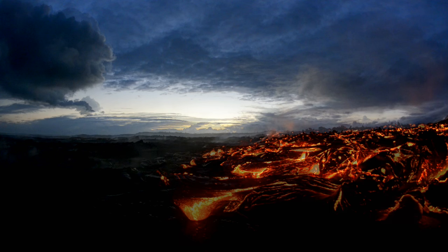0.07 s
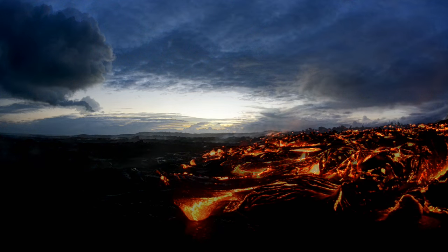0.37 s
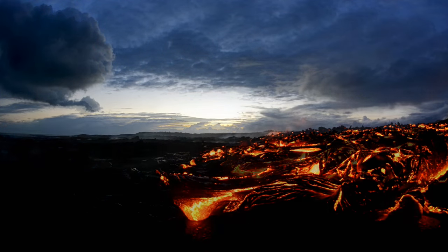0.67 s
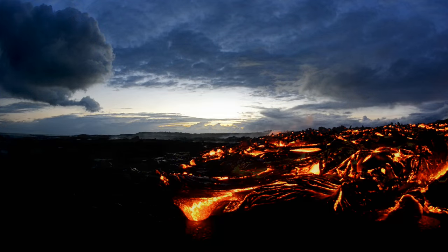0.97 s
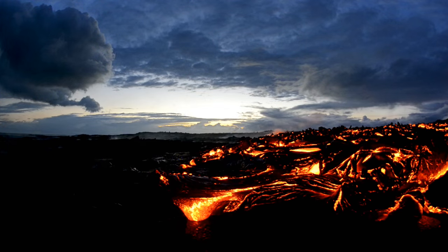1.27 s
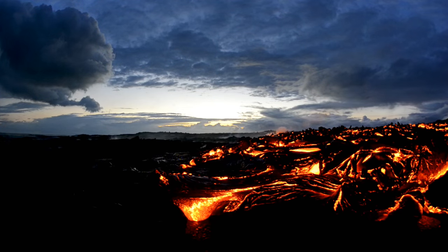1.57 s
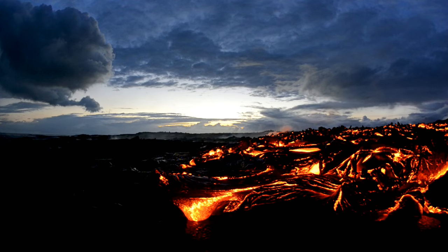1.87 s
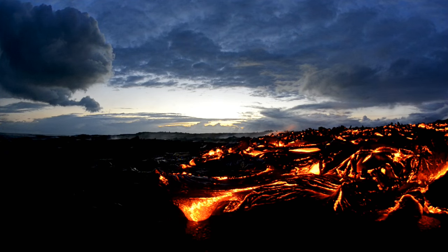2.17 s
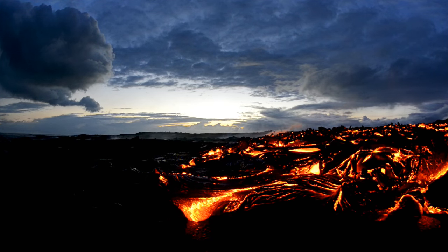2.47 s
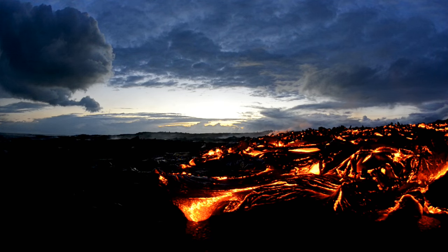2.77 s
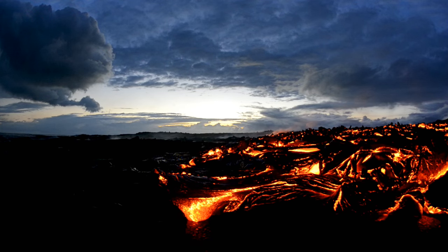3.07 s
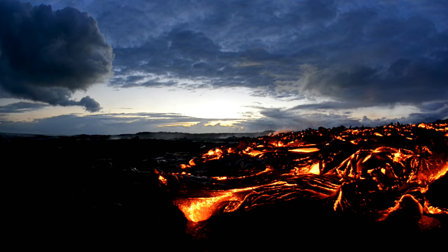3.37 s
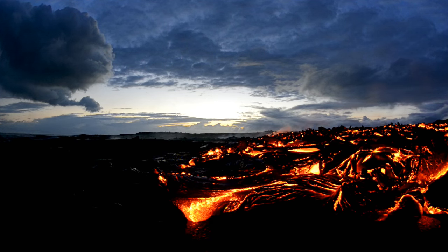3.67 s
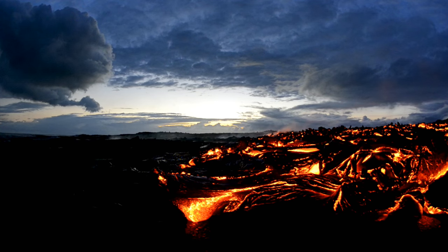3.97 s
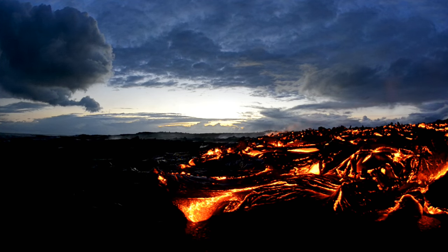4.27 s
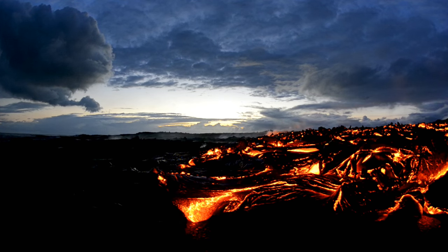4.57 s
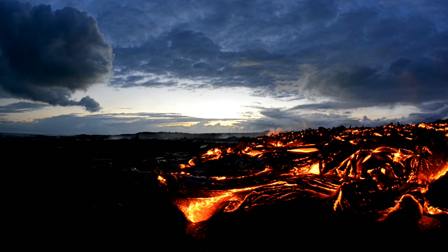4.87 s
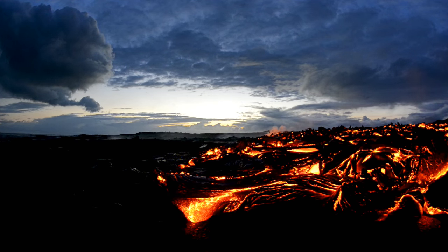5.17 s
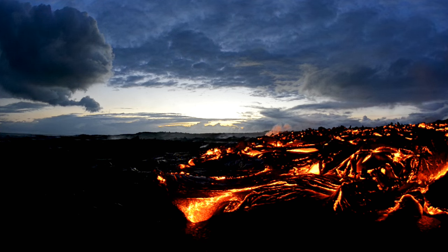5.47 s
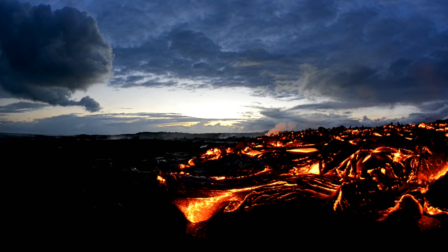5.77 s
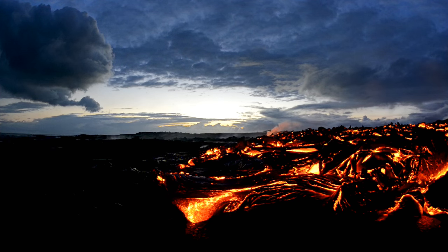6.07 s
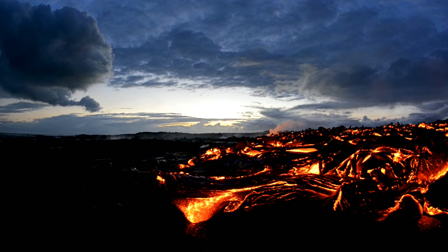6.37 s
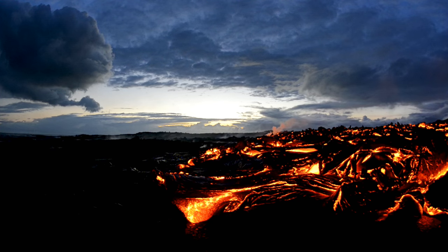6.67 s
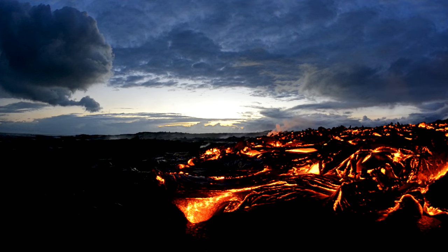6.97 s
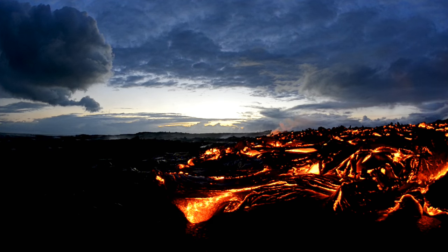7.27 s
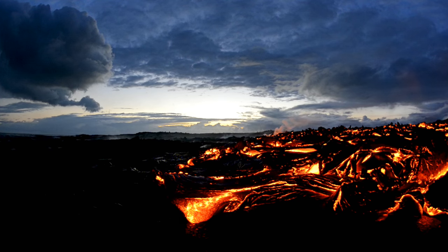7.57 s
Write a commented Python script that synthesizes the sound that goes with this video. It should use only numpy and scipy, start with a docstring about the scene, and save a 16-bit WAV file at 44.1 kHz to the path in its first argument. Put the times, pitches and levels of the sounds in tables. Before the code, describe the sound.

A low wind rumble and the continuous crackle of cooling lava run together for about eight seconds, on open ground with no echo. A faint sizzle sits above the crackle, and close dry cracks, tiny glassy snaps and small crunches pop out irregularly, several each second. At about 1.8 seconds a loose slab of rock gives a short, loud knock. From 2.7 to 3.7 seconds thin flakes tick off in quick, high runs, with a strong crack at 3.1 and a low gust at 3.4. A softer knock comes near 4 seconds, and crackle and wind swell briefly at 4.7. Between 5 and 5.6 seconds louder cracks cluster with short spurts of sizzle. Another sharp crack lands at 6.8. The wind is a little stronger in the second half, buffeting the microphone around 7.2 to 7.5 seconds while the crackling carries on.

```python
"""The crust of a lava flow cools and breaks up in the open air, each fracture radiating a pressure pulse.
Near cracks are single sharp pulses, glassy flakes tick off in runs, crumbs of clinker crunch and two
loose slabs knock. Behind them countless fractures superpose into a crackle and sizzle; the busier the
flow, the louder its small breaks. The eddies of a gusty wind rumble on the microphone."""
import sys
import numpy as np
from scipy import signal
from scipy.fft import rfft, irfft, next_fast_len
from scipy.io import wavfile

SR = 44100
rng = np.random.default_rng(int(sys.argv[2]) if len(sys.argv) > 2 else 0)


def unload_audio(sound):
    """Save the sound as a 16-bit wav file, at the path given as the first command line argument."""
    columns = np.transpose(np.atleast_2d(sound))
    # keep every value between -1 and 1, then stretch to whole-number steps
    steps = np.round(np.clip(columns, -1, 1) * 32767)
    wavfile.write(sys.argv[1], SR, steps.astype(np.int16))


N = 345303
TIME = np.arange(N) / SR

# The breeze between gusts, freshening slowly. Each row: time in seconds, level in dB.
BREEZE = [(0.0, -24.5), (0.5, -19.5), (1.2, -19.5), (1.43, -23), (1.85, -19), (2.3, -23), (2.8, -20.5),
          (3.2, -23.5), (3.4, -15.5), (3.95, -19.5), (4.55, -16), (5.05, -19), (5.5, -16), (6.1, -17.5),
          (6.52, -18), (6.85, -16.5), (7.25, -14.5), (7.83, -16)]
# Spectra of large and of smaller eddies. Each row: frequency in Hz, relative level in dB.
RUMBLE_SPECTRUM = [(15, -20), (25, -8), (42, 0), (65, 1.5), (100, 1.5), (140, -1.5), (200, -16),
                   (320, -26.5)]
BUFFET_SPECTRUM = [(70, -11), (120, -5), (160, 0), (240, -5), (320, -12), (450, -19.5), (700, -30.5),
                   (1500, -42)]
# How busy the cooling crust is. Each row: time in seconds, crackle level in dB.
CRUST_ACTIVITY = [(0.0, -26), (0.2, -29), (1.3, -25.5), (2.35, -23.8), (2.55, -25.5), (3.7, -24.5),
                  (4.5, -25.5), (4.72, -18.5), (4.86, -25.5), (6.3, -25.5), (7.83, -25)]
USUAL_CRACKLE_DB = -25
# Filters that colour the crackle and the sizzle. Each row: frequency in Hz, relative gain in dB.
CRACKLE_SPECTRUM = [(250, -6.5), (450, 1.5), (700, 1), (950, 0), (1250, 4), (1800, -0.5), (2500, -1.5),
                    (3500, -8.5), (5000, -16.5), (8000, -24), (15000, -26)]
SIZZLE_SPECTRUM = [(2500, 10), (5000, 0.5), (7000, 0.5), (9500, -1.5), (12500, -3.5), (14500, -7),
                   (16000, -10)]
# Patches of glassy skin spalling. Each row: centre in seconds, rise of sizzle in dB, width in seconds.
FLURRIES = [(2.7, 4.5, 0.2), (3.14, 3.5, .06), (3.58, 4, .04), (4.53, 6, 0.027), (5.05, 12, 0.04),
            (5.23, 6, 0.065), (5.6, 9, 0.025), (6.02, 6.5, .025), (7.62, 10, 0.018)]
# Runs of flakes. Each row: start in seconds, length in seconds, mid-run level in dB, spacing in seconds.
TICK_RUNS = [(2.716, .21, -15.5, .016), (2.988, 0.3, -19.5, .034), (3.26, 0.23, -14.5, .022),
             (3.493, 0.21, -14, 0.036)]
# Near cracks of thick crust and snaps of thin glass. Each row: start in seconds, level in dB, pitch in Hz.
CRUST_CRACKS = [(0.8241, -6, 2090), (1.2861, -3.5, 1340), (1.4033, 2, 2200), (1.426, -3, 2090),
                (1.4503, -2, 1470), (1.7977, -9, 870), (1.8924, 0, 1000), (1.9546, -4, 2240),
                (2.0016, 2.5, 1610), (2.203, -4, 1020), (2.2674, -1.5, 1470), (2.2725, -2.5, 1610),
                (2.4614, -4, 1610), (2.647, -1.5, 1610), (2.659, -2, 1610), (2.8244, -6, 1910),
                (3.127, 7.5, 1750), (3.1421, -2, 1230), (3.5892, -4, 800), (4.281, -6, 840),
                (4.8843, -6, 2400), (5.0513, 2, 1910), (5.1781, -4.5, 1030), (5.221, -2.5, 1350),
                (5.2656, 7, 1470), (5.3561, 5, 1530), (5.4318, -3, 2520), (5.5888, 3, 2100),
                (6.0284, -4, 2710), (6.1385, 0, 2200), (6.5392, -2.5, 1260), (6.7871, 5, 1300),
                (6.8397, -6.5, 270), (7.0297, -5, 1240), (7.0662, -5, 450), (7.1014, -5.5, 2280),
                (7.3868, -7, 1090), (7.415, -5.5, 780), (7.548, -3, 950)]
GLASS_SNAPS = [(0.4383, -7.5, 11500), (1.0475, -4.5, 11000), (1.7976, -2.5, 7500), (1.8923, -1.5, 10000),
               (1.9046, -4, 12000), (2.0016, -2.5, 8450), (2.272, -6, 10500), (2.5207, -4, 14000),
               (3.5978, -9, 9000), (3.7659, -5.5, 10000), (4.3088, -11, 11500), (4.9882, -8, 8500),
               (5.051, -10, 8500), (5.086, -2, 9500), (5.2214, -4, 12500), (5.5886, -3.5, 11500),
               (5.5983, -8, 12000), (5.884, -14, 12500), (6.0031, -11, 10500), (6.0284, -7, 11500),
               (6.1389, -9.5, 5500), (6.317, -7, 8950), (6.5295, -7, 8000), (6.7169, -7.5, 11000)]
# Single eddies. Each row: centre in seconds, level in dB, width in seconds, pitch in Hz.
GUSTS = [(.24, -22.5, 0.032, 169), (.92, -14.5, 0.031, 85), (.93, -23.5, 0.027, 237),
         (1.25, -18, 0.049, 240), (1.89, -15.5, 0.032, 55), (2.655, -10, 0.041, 68),
         (2.71, -12, 0.036, 179), (2.83, -20, 0.04, 246), (2.97, -14, 0.022, 89), (3.29, -15, .025, 84),
         (3.42, -6, 0.032, 61.6), (3.75, -22.5, 0.052, 280), (4.3, -16.5, 0.044, 179),
         (4.45, -13, 0.043, 88.5), (4.72, -11, 0.047, 115), (4.72, -21.5, 0.056, 314),
         (6.2, -12, 0.04, 169), (7.18, -18, 0.035, 160), (7.33, -10.5, 0.03, 55), (7.33, -22.5, .03, 313),
         (7.5, -9, 0.042, 101)]
# The loudest crumbs of clinker. Each row: centre in seconds, level in dB, pitch in Hz, quality factor.
CRUNCHES = [(.819, -22.5, 1850, 2), (1.765, -19.5, 1400, 1.6), (2.378, -21.5, 2190, 2.2),
            (2.424, -16.5, 1970, 2), (2.653, -22, 2100, 1.7), (2.959, -20.5, 1810, 2.9),
            (3.298, -25, 1340, 5), (3.392, -19.5, 1310, 4), (3.863, -19.5, 1390, 2.4),
            (4.103, -18.5, 1250, 1.8), (4.124, -19, 1460, 1.7), (4.766, -20, 1330, 2.1),
            (4.959, -17.5, 1620, 3.5), (5.5, -20.5, 1490, 5.8), (6.913, -23.5, 3260, 11),
            (7.417, -17.5, 980, 2.9), (7.548, -22.5, 1600, 5)]
# Impacts of loose slabs. Each row: start in seconds, ring level in dB, thud level in dB.
KNOCKS = [(1.7519, -13, 13.5), (1.7533, 1, 7), (1.7985, -16, -18), (1.8190, -18, -25), (1.8212, -3, -25),
          (4.0598, -8, -4)]
# Normal modes of a slab. Each row: frequency in Hz, level in dB, time to decay by 60 dB in seconds.
SLAB_MODES = [(574, -1, 0.0073), (676, 0.5, 0.0096), (1084, -6.5, 0.04), (1145, 0.5, 0.029),
              (1610, -2, 0.011), (2400, -18, 0.013)]


def from_db(db):
    """Decibels are logarithmic: 20 dB is a tenfold amplitude."""
    return 10 ** (np.asarray(db) / 20)


def unit_rms(x):
    """Normalisation to unit mean power."""
    return x / np.sqrt(np.mean(x ** 2) + 1e-20)


def bell(t, width_s):
    """A Gaussian envelope of height 1 around t = 0."""
    return np.exp(-.5 * (t / width_s) ** 2)


def add(out, s, sound):
    """Superposition: a short sound joins the mix at s seconds."""
    at = int(np.clip(round(s * SR), 0, N - 1))
    out[at:at + len(sound)] += sound[:N - at]


def coloured(x, spectrum):
    """Minimum-phase filtering imposes a spectrum causally; the result has rms 1."""
    size = next_fast_len(N + 8192, real=True)
    hz, db = np.transpose(spectrum)
    grid = np.maximum(np.fft.rfftfreq(size, 1 / SR), 1)
    octaves_past_top = np.maximum(np.log2(grid / hz[-1]), 0)
    gain_db = np.interp(np.log(grid), np.log(hz), db) - 20 * octaves_past_top
    cepstrum = irfft(np.log(from_db(gain_db)), size)
    cepstrum[1:size // 2] *= 2  # fold onto positive time
    cepstrum[size // 2 + 1:] = 0
    response = np.exp(rfft(cepstrum))
    return unit_rms(irfft(rfft(x, size) * response, size)[:N])


def drift(per_s):
    """Random modulation: straight lines join per_s Gaussian values a second; rms 1."""
    knots = rng.standard_normal(4096)
    return unit_rms(np.interp(TIME * per_s, np.arange(len(knots)), knots))


def resonate(x, hz, q):
    """A damped resonance, rolled off from an octave above its pitch."""
    hz = min(hz, .45 * SR)
    radius, angle = np.exp(-np.pi * hz / q / SR), 2 * np.pi * hz / SR
    rung = signal.lfilter([1, 0, -1], [1, -2 * radius * np.cos(angle), radius ** 2], x + 1e-18)
    return signal.lfilter([1], [1, -np.exp(-2 * angle)], rung)


def pulse(hz, q):
    """One fracture as an impulse response: a sharp push, a pull and a little ringing; peak 1."""
    shape = resonate(signal.unit_impulse(700), hz, q)
    return shape / np.abs(shape).max()


def clicks(per_s, spread_db):
    """A Poisson process of impulses, many small and few large."""
    sizes = from_db(spread_db * np.minimum(rng.exponential(1, N), 5.3))
    signs = rng.choice([-1, 1], N)
    return sizes * signs * (rng.random(N) < per_s / SR)


def fragments(train, low_hz, high_hz, q, count):
    """Size sets resonant pitch: each click excites one of `count` fragments; about even power per Hz."""
    dealt = rng.integers(0, count, N)
    pitches = np.geomspace(low_hz, high_hz, count)
    return sum(np.sqrt(hz) * unit_rms(resonate(train * (dealt == k), hz, q))
               for k, hz in enumerate(pitches))


def small_breaks(per_s, db, spread_db, hz, octaves):
    """A renewal process, louder on busy crust. Each row: time in seconds, level in dB, pitch in Hz."""
    times = np.cumsum(rng.gamma(2, .5, 200)) / per_s
    strength, detune = np.clip(rng.standard_normal((2, len(times))), -2, 2)
    busy_db = np.interp(times, *np.transpose(CRUST_ACTIVITY)) - USUAL_CRACKLE_DB
    levels_db = db + spread_db * strength + 1.5 * busy_db
    rows = np.transpose([times, levels_db, hz * 2 ** (octaves * detune)])
    return list(rows[times < TIME[-1]])


def wind(steady_db=-18, buffet_growth=1.53):
    """Turbulence: large eddies rumble; smaller ones buffet and grow faster as the breeze freshens."""
    wind_db = np.interp(TIME, *np.transpose(BREEZE))
    buffet_db = -18.9 + buffet_growth * (wind_db - steady_db)
    lumps = from_db(1.16 * drift(35))  # quick swells shared by both bands
    rumble = coloured(rng.standard_normal(N) * lumps, RUMBLE_SPECTRUM)
    buffet = coloured(rng.standard_normal(N) * lumps, BUFFET_SPECTRUM)
    return from_db(wind_db + 1.1) * rumble + from_db(buffet_db) * buffet


def cooling_flow():
    """Incoherent summation: countless fractures come in clumps, and the farthest merge into noise."""
    clumps = from_db(3.3 * drift(70))
    coarse = fragments(clicks(1700 * clumps, spread_db=3.5), low_hz=604, high_hz=6200, q=3.3, count=16)
    fine = fragments(clicks(1300 * clumps, spread_db=4.5), low_hz=4300, high_hz=14000, q=4.8, count=8)
    far_wash = from_db(1.5) * rng.standard_normal(N)
    far_hiss = rng.standard_normal(N) * clumps ** 0.55
    crackle = coloured(unit_rms(coarse) + far_wash, CRACKLE_SPECTRUM)
    sizzle = coloured(unit_rms(fine) + unit_rms(far_hiss), SIZZLE_SPECTRUM)
    crackle_db = np.interp(TIME, *np.transpose(CRUST_ACTIVITY)) - 1.4
    flurry_db = sum(db * bell(TIME - s, width_s) for s, db, width_s in FLURRIES)
    sizzle_db = crackle_db - 13.6 + flurry_db + 1.3 * drift(25)
    return from_db(crackle_db) * crackle + from_db(sizzle_db) * sizzle


def flake_ticks(q=4.8, end_sag_db=4.5, spread_db=4, jitter=0.096):
    """Free vibration: tiny glass flakes ring high for a few cycles, singly or in swelling runs."""
    out, flake = np.zeros(N), pulse(hz=12500, q=q)
    for start, length, db, spacing in TICK_RUNS:
        for k, (lateness, strength) in enumerate(rng.standard_normal((40, 2))):
            age = spacing * (k + jitter * lateness)
            if age < length:
                sag_db = end_sag_db * (2 * age / length - 1) ** 2
                add(out, start + age, from_db(db - sag_db + spread_db * strength) * flake)
    for s, db, hz in small_breaks(per_s=8, db=-23, spread_db=2.5, hz=12800, octaves=0.5):
        add(out, s, from_db(db) * pulse(hz, q))
    return out


def cracks(dull_hz=8000, scatter_decay_s=0.00095):
    """Brittle fracture: thick crust cracks low, thin glass snaps high; rough ground scatters both."""
    thick, thin = np.zeros(N), np.zeros(N)
    for s, db, hz in CRUST_CRACKS + small_breaks(per_s=7, db=-9.5, spread_db=1.9, hz=1800, octaves=0.4):
        add(thick, s, from_db(db - 0.5) * pulse(hz, q=0.72))
    for s, db, hz in GLASS_SNAPS + small_breaks(per_s=2.5, db=-18.5, spread_db=5, hz=9000, octaves=0.5):
        add(thin, s, from_db(db + 0.4) * pulse(hz, q=1.0))
    direct = signal.sosfilt(signal.butter(2, dull_hz, fs=SR, output="sos"), thick) + thin
    t = TIME[:SR // 50]
    ground = rng.standard_normal(len(t)) * np.exp(-t / scatter_decay_s)
    scattered = signal.fftconvolve(direct, ground / np.linalg.norm(ground))[:N]
    return direct + from_db(-11) * scattered


def gusts(q=1.16):
    """Convection carries an eddy over the microphone: the smaller it is, the higher it flutters."""
    out = np.zeros(N)
    for s, db, width_s, hz in GUSTS:
        swell = bell(TIME - s, width_s)
        flutter = swell * resonate(resonate(rng.standard_normal(N), hz, q), hz, q)
        out += from_db(db) * flutter * np.linalg.norm(swell) / np.linalg.norm(flutter)
    return out


def clinker_crunches(width_s=0.0042, small_q=2.2, samples=2000):
    """Resonant excitation: a crumb gives way in a brief swell of tiny fractures; hollow ones ring."""
    out, train = np.zeros(N), clicks(per_s=3500, spread_db=3.0)
    t = (np.arange(samples) - samples / 2) / SR
    swell = bell(t, width_s)
    small = small_breaks(per_s=2, db=-24.5, spread_db=1.2, hz=1600, octaves=0.58)
    crumbs = CRUNCHES + [(*row, small_q) for row in small]
    for k, (s, db, hz, q) in enumerate(crumbs):
        burst = resonate(train[k * samples:(k + 1) * samples] * swell, hz, q)
        add(out, s + t[0], from_db(db) * burst * np.linalg.norm(swell) / np.linalg.norm(burst))
    return out


def slab_knocks(thud_hz=320, thud_t60_s=0.011, contact_s=0.00075):
    """Modal vibration: a slab drops softly on its neighbours, thuds and rings; close modes beat."""
    out, t = np.zeros(N), TIME[:SR // 10]
    contact = 1 - np.exp(-(t / contact_s) ** 2)
    ring = sum(from_db(db - 60 * t / t60) * np.sin(2 * np.pi * hz * t) for hz, db, t60 in SLAB_MODES)
    thud = from_db(-60 * t / thud_t60_s) * np.sin(2 * np.pi * thud_hz * t)
    for s, ring_db, thud_db in KNOCKS:
        add(out, s, contact * (from_db(ring_db) * ring - from_db(thud_db) * thud))
    return out


def scene():
    """Superposition at one microphone on open ground, without reverberation."""
    air = wind() + gusts()
    lava = cooling_flow() + cracks() + flake_ticks() + clinker_crunches() + slab_knocks()
    return (air + lava)[None]


def record(dry, low_hz=10, top_hz=15900):
    """Band limiting and saturation: steady pressure is blocked, tall peaks overload, the top is cut."""
    heard = signal.sosfilt(signal.butter(1, low_hz, "high", fs=SR, output="sos"), dry)
    rounded = heard / (1 + np.abs(heard) ** 10) ** (1 / 10)
    return signal.sosfilt(signal.ellip(10, .2, 80, top_hz, fs=SR, output="sos"), rounded)


dry = scene()
out = record(dry)
unload_audio(out)
```